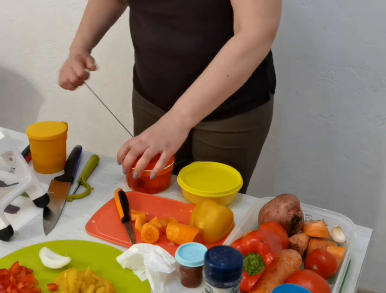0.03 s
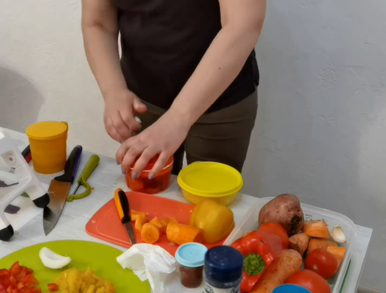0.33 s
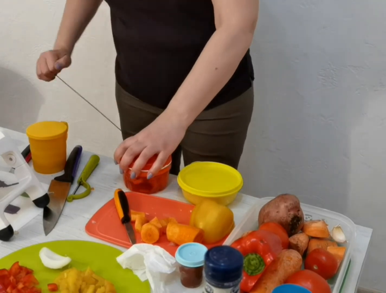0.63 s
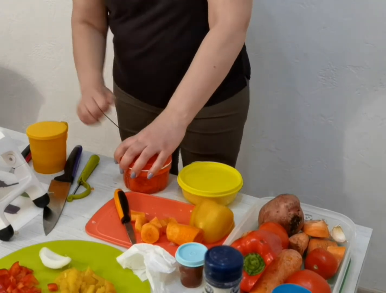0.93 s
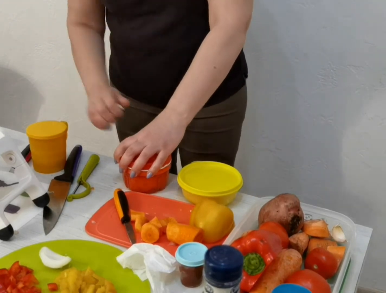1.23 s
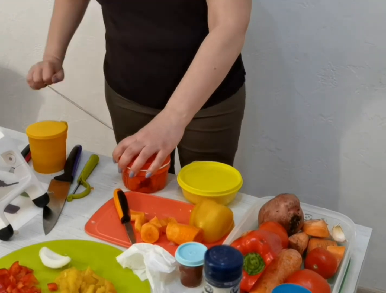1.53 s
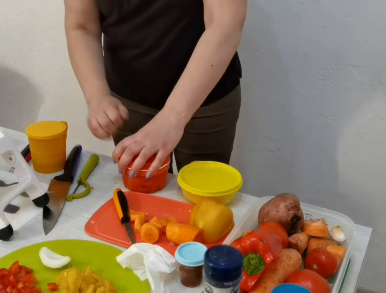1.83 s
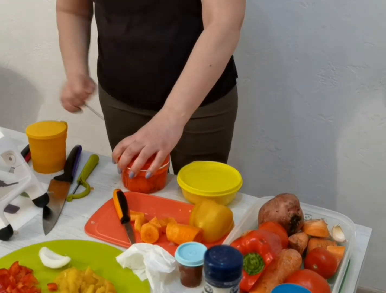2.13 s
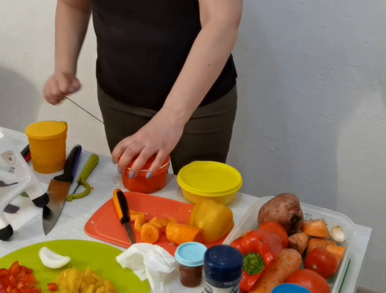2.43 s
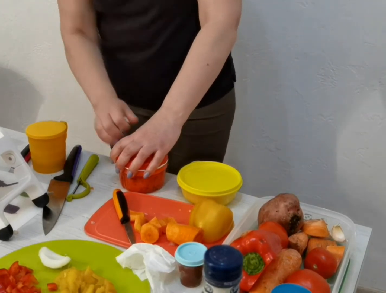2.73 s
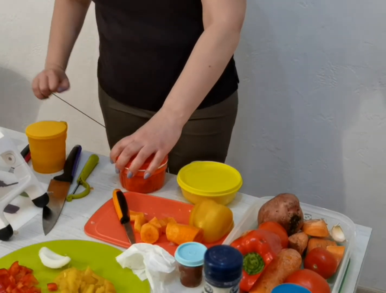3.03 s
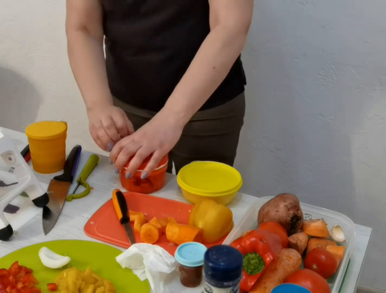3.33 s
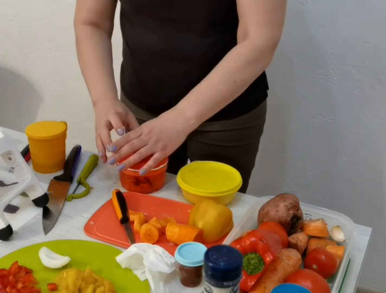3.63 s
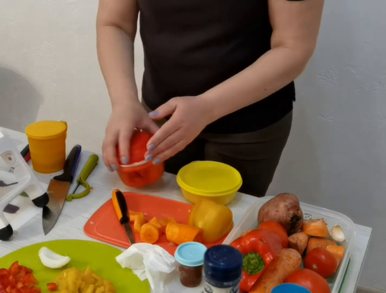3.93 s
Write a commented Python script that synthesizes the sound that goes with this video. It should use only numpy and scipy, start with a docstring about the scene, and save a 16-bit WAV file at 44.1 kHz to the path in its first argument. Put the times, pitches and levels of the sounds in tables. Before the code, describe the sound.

Close to the microphone, a hand-pulled food chopper grinds and rattles vegetables in its plastic bowl, alternating with the zip of its rewinding cord. Seven quick pulls end in a short rewind and clicks, over soft, steady kitchen sizzling.

```python
"""A kitchen, in stereo, close to a table where a pull-cord chopper stands a little to the left.
It is pulled seven times. Each pull grinds the drive while the blades cut vegetable pieces and throw them
against the plastic bowl; then the spring rasps the cord back in and the blades coast. A last short rewind
takes up the slack. The table shudders underneath, and something sizzles steadily in the room."""
import sys
import numpy as np
from scipy import signal
from scipy.fft import rfft, irfft
from scipy.io import wavfile

SR = 44100
rng = np.random.default_rng(int(sys.argv[2]) if len(sys.argv) > 2 else 0)


def dump(signal):
    """Clip the signal to [-1, 1] and save it as 16-bit WAV at the path in sys.argv[1]."""
    limited = np.clip(np.atleast_2d(signal).T, -1, 1)
    pcm = np.round(limited * 32767).astype(np.int16)
    wavfile.write(sys.argv[1], SR, pcm)


N = 176400
TIME = np.arange(N) / SR

# pulls of the cord: start_s, rise_s, fall_s, drive_db, knock_db, cut_db, hollow_hz, hollow_db
PULLS = [(-.08, 0.099, 0.28, -31, -20.5, -28.5, 560, -32.5), (.42, 0.14, 0.17, -30.5, -24.5, -23, 814, -36),
         (.89, .13, 0.16, -30, -27, -25, 600, -38), (1.35, 0.14, .16, -30.5, -29, -25, 550, -38),
         (1.8, .18, .15, -30.5, -34, -26.5, 836, -39), (2.31, .15, .19, -30.5, -32.5, -26, 755, -39.5),
         (2.85, 0.14, 0.2, -33, -32, -28, 741.6, -33)]
# the cord runs back: start_s, attack_s, hold_s, release_s, scrape_hz, scrape_width_hz,
# rasp_db, spring_db, scrape_db, coasting_db, eyelet_db
REWINDS = [(0.17, 0.098, 0.015, 0.19, 2700, 400, -27.5, -25, -32, -29.5, -32),
           (0.651, 0.08, 0.087, 0.1, 2450, 806, -29, -25, -36.5, -30, -29.5),
           (1.151, .025, .1, 0.1, 2340, 500, -28, -30, -36, -33.5, -42),
           (1.593, 0.044, 0.081, 0.21, 2620, 500, -29, -31, -39, -32, -34),
           (2.081, 0.031, .077, 0.19, 2950, 900, -29.5, -32.5, -34.5, -35, -32.5),
           (2.601, 0.015, 0.086, .15, 2308, 700, -28, -29.5, -39, -32.5, -36),
           (3.166, 0.025, 0.058, .15, 2820, 480, -28, -29.5, -29, -33, -29),
           (3.517, .003, 0.073, 0.1, 2500, 520, -31.5, -36, -32.5, -63, -35)]
# resonances of the bowl, the spring housing and the cord's rasp: pitch_hz, width_hz, boost_db
BOWL_MODES = [(83, 7.9, 10), (99, 4.6, 4), (160.3, 6, 7), (209, 6.5, 6), (236.5, 3, 6.5), (318, 6.7, 12),
              (361, 9.1, 2.5), (387, 11, 7)]
HOUSING_MODES = [(1571, 25, 3), (2064, 20, 5), (2145, 70, 6), (2340, 60, 3), (2492, 22, 5), (2635, 50, 5),
                 (2900, 200, 2), (3433, 35, 8)]
RASP_MODES = [(4467, 20, 8), (4650, 60, 4), (6400, 120, 3), (6978, 60, 5), (8380, 220, 3)]
# broad spectrum of the spring housing: frequency_hz, relative_db
HOUSING_COLOUR = [(200, -24.5), (700, -4), (1100, -6), (1600, -1), (2300, 1), (3000, 0), (3800, -6.5),
                  (6000, -6), (14000, -32)]


def from_db(db):
    """Decibels to gain."""
    return 10 ** (np.asarray(db) / 20)


def at_hz(points, hz):
    """Reads a table on a log-frequency axis."""
    f, value = np.transpose(points)
    return np.interp(np.log(hz + 1), np.log(f), value)


def convolve(x, response):
    """Plays x through one response per row."""
    return signal.fftconvolve(np.atleast_2d(x), np.atleast_2d(response), axes=1)[:, :N]


def body(x, colour, modes=(), size=16384):
    """A causal body of unit power gain: a broad colour with resonances standing out of it."""
    hz = np.arange(size // 2 + 1) * SR / size
    power = np.ones(len(hz))
    for f, width, boost in modes:
        power += (from_db(abs(boost)) ** 2 - 1) / (1 + (2 * (hz - f) / width) ** 2)
    cepstrum = irfft(np.log(from_db(at_hz(colour, hz)) * np.sqrt(power)))
    cepstrum[size // 2:] = 0   # minimum phase
    cepstrum[0] = 0
    response = irfft(np.exp(rfft(2 * cepstrum)))
    return convolve(x, response / np.linalg.norm(response))[0]


def resonate(x, hz, width_hz):
    """One resonance with a gain of 1 at its peak."""
    r = np.exp(-np.pi * width_hz / SR)
    feedback = [1, -2 * r * np.cos(2 * np.pi * hz / SR), r * r]
    return signal.lfilter(np.array([1, 0, -1]) * (1 - r * r) / 2, feedback, x + 1e-18)


def glide(x, hz, width_hz):
    """A resonance whose centre follows the curve hz; white noise keeps its rms."""
    turn = np.exp(2j * np.pi * np.cumsum(hz) / SR)
    narrow = signal.sosfilt(signal.butter(2, width_hz / 2, fs=SR, output="sos"), x * turn.conj() + 1e-18)
    return (narrow * turn).real * np.sqrt(2 * SR / width_hz)


def grains(per_s, spread_db):
    """Random tiny contacts of uneven size; rms 1."""
    sizes = from_db(spread_db * np.clip(rng.standard_normal(N), -2, 2)) * rng.choice([-1, 1], N)
    x = sizes * (rng.random(N) < per_s / SR)
    return x / (x.std() + 1e-12)


def contacts(per_s, jitter, spread_db):
    """One click each time a tooth or blade comes round, uneven in time and size; rms about 1."""
    passes = np.cumsum(per_s * np.ones(N)) / SR
    timing, strength = rng.standard_normal((4096, 2)).T
    at = np.searchsorted(passes, np.arange(len(timing)) + jitter * timing)
    inside = (at > 0) & (at < N)
    sizes = from_db(spread_db * np.clip(strength, -2, 2))
    polarity = np.sign(np.sin(timing * SR))
    x = np.zeros(N)
    x[at[inside]] = (polarity * sizes / np.sqrt(np.mean(sizes ** 2)))[inside]
    return x * np.sqrt(SR / per_s)


def blows(rows, decay_s, size=4096):
    """Each blow rings briefly at its own pitch, with no weight far below it."""
    out, t = np.zeros(N + size), np.arange(size) / SR
    for (start, db, hz), sign in zip(rows, rng.choice([-1, 1], len(rows))):
        at = int(max(start, 0) * SR)
        ring = sign * from_db(db) * np.sin(2 * np.pi * hz * t) * np.exp(-t / decay_s)
        out[at:at + size] += signal.sosfilt(signal.butter(2, hz / 2, "high", fs=SR, output="sos"), ring)
    return out[:N]


def stereo_grit(level, colour, modes, per_s, spread_db):
    """Grains under a level curve, through a body; their diffuse share differs between the sides."""
    # how diffusely the grains reach the microphones: frequency_hz, side_over_mid_db
    diffuse = [(1000, -4), (2500, 0.5), (4500, -1), (6000, 3.5), (7200, -8), (8800, -53), (10500, -3),
               (13000, -7)]
    mid, side = (body(level * grains(per_s, spread_db), colour, modes) for _ in range(2))
    side = irfft(rfft(side) * from_db(at_hz(diffuse, np.arange(N // 2 + 1) * SR / N)), N)
    return np.array([mid + side, mid - side])


def kitchen_response(size=14000):
    """Stereo reflections of the kitchen: octave bands of noise, each dying at its own rate."""
    # reverberation time: frequency_hz, t60_s
    decay_times = [(100, 0.059), (500, 0.36), (2000, 0.31), (8000, 0.099), (16000, 0.096)]
    t, hz = np.arange(size) / SR, np.arange(size // 2 + 1) * SR / size
    white, out = rfft(rng.standard_normal((2, size))), 0
    octaves = np.log2(np.geomspace(62.5, 16000, 9))
    for centre, share in zip(octaves, np.eye(len(octaves))):
        band = irfft(white * np.interp(np.log2(hz + 1), octaves, share))
        out += band * 1000 ** (-t / at_hz(decay_times, 2 ** centre))
    out *= t > .002
    return out / np.linalg.norm(out, axis=1, keepdims=True)


def reverberate(x, room, wet_db):
    """Adds the kitchen to a stereo source."""
    return x + from_db(wet_db) * convolve(x, room)


def place(x, room, wet_db, pan_db, left_lead_s=.00007):
    """Direct sound, reaching the left microphone first, plus reflections, at constant power."""
    wet = from_db(wet_db)
    right = np.interp(np.arange(N) - np.round(left_lead_s * SR), np.arange(N), x)
    pan = from_db([[pan_db / 2], [-pan_db / 2]])
    return pan * (np.array([x, right]) + wet * convolve(x, room)) / np.sqrt(1 + wet ** 2)


def background(room):
    """A fine steady sizzle over the low tone of the room."""
    # spectra of the room tone and the sizzle: frequency_hz, relative_db
    tone_colour = [(25, -7), (55, -8.5), (100, 4), (270, 2), (500, 0.5), (900, -13), (2000, -17),
                   (6000, -11.5)]
    sizzle_colour = [(900, -25.5), (2000, -15.5), (3300, -18.5), (5000, -13), (6200, -4), (7200, -1),
                     (8200, 2.5), (9200, -5), (10300, -7.5), (11600, -18.5), (15500, -23)]
    tone = from_db(-44) * body(rng.standard_normal(N), tone_colour)
    sizzle = stereo_grit(from_db(-31), sizzle_colour, (), per_s=9000, spread_db=1)
    return sizzle + place(tone, room, wet_db=-6, pan_db=1.5)


def table_and_thrum():
    """The table shudders at its lowest mode under the chopper, and the blades thrum low beside it."""
    # the table's mode and the blades' thrum: pitch_hz, width_hz
    modes = [(52, 5.5), (95, 57)]
    # their levels: time_s, table_db, thrum_db
    shudder = [(0, -42, -39), (.3, -44, -47), (.55, -56, -50), (.85, -57, -54), (1.12, -38.5, -60),
               (1.4, -65, -48.5), (2.3, -62, -52.5), (2.48, -51, -40), (2.7, -58, -54), (2.999, -57, -43.5),
               (3.28, -60, -41.5), (3.5, -58, -66)]
    times, *curves = np.transpose(shudder)
    out = 0
    for (hz, width), db in zip(modes, curves):
        rumble = resonate(resonate(rng.standard_normal(N + SR), hz, width), hz, width)[SR:]
        out += rumble / rumble.std() * from_db(np.interp(TIME, times, db))
    return out


def clacks(room):
    """The drive catches or the handle clicks home: a quickly dying cluster of contacts rings the housing."""
    # each clack: start_s, snap_db, housing_db, decay_s
    hits = [(.353, -25, -34, 0.022), (0.423, -25.5, -25.5, 0.011), (0.505, -39, -29, 0.0088),
            (0.62, -22.5, -28, 0.017), (0.905, -28, -29, 0.014), (1.201, -25.5, -42, .018),
            (1.36, -26, -30.5, 0.015), (1.537, -22.5, -29, 0.017), (2.319, -29, -33, 0.013),
            (2.417, -27, -35, 0.012), (2.516, -24, -33, 0.013), (2.842, -26, -32, 0.023),
            (3.183, -32, -28, 0.0091), (3.526, -18, -31, 0.0034), (3.534, -22, -34, 0.0044),
            (3.564, -30, -39, 0.004)]
    # spectrum of the snap: frequency_hz, relative_db
    snap_colour = [(1000, -23), (3500, -6), (5000, 16.5), (6800, 18), (8500, 16), (10200, 18.5),
                   (12000, -2), (15500, -40)]
    snap_level, ring_level = sum(
        from_db(db)[:, None] * (TIME >= start) * np.exp(-np.abs(TIME - start) / decay)
        for start, *db, decay in hits)
    snap = stereo_grit(snap_level, snap_colour, RASP_MODES, per_s=4900, spread_db=1.5)
    ring = stereo_grit(ring_level, HOUSING_COLOUR, HOUSING_MODES, per_s=5000, spread_db=2.5)
    return reverberate(snap + ring, room, wet_db=-2.5)


def rewind_shape(start, attack, hold, release):
    """The level of one rewind rises to 1, holds and dies away."""
    t = TIME - start
    return np.clip(t / attack, 0, 1) * np.exp(-2 * (np.maximum(t - attack - hold, 0) / release) ** 1.09)


def coasting_blades(room, whirr_hz=401.7, sag_per_s=0.84):
    """The freewheeling blades rattle the bowl and hum lower as they slow."""
    swirl, rattle_level, whirr = rng.standard_normal(N), 0, 0
    for start, attack, hold, release, *_, coasting_db, _ in REWINDS:
        level = from_db(coasting_db) * rewind_shape(start, attack, hold, release)
        rattle_level += level
        pitch = whirr_hz * np.exp(-sag_per_s * np.maximum(TIME - start, 0))
        whirr += glide(level * swirl, pitch, width_hz=35)
    # spectrum of the rattle: frequency_hz, relative_db
    rattle_colour = [(30, -25), (60, -25), (100, -4), (200, 6), (350, 3), (480, -3.5), (800, -16),
                     (1500, -4), (4000, -50), (12000, -73)]
    rattle = body(rattle_level * contacts(300, jitter=0.363, spread_db=5.5), rattle_colour, BOWL_MODES)
    return place(0.88 * rattle + from_db(-9.5) * whirr, room, wet_db=-12.5, pan_db=2)


def return_spring(room, sag_per_s=0.7):
    """The coils rub and ring their housing; their scrape sinks in pitch as the spring relaxes."""
    slips, coil_level, scrape = grains(per_s=2500, spread_db=0.5), 0, 0
    for start, attack, hold, release, hz, width_hz, _, spring_db, scrape_db, *_ in REWINDS:
        shape = rewind_shape(start, attack, hold, release)
        coil_level += 1.06 * from_db(spring_db) * shape
        pitch = hz * (1 - sag_per_s * np.clip(TIME - start, 0, attack + hold))
        scrape += glide(from_db(scrape_db) * shape * slips, pitch, width_hz)
    rubs = [from_db(side_db) * coil_level * grains(per_s=1500, spread_db=0.5) for side_db in (.5, -.5)]
    coils = np.array([body(rub, HOUSING_COLOUR, HOUSING_MODES) for rub in rubs])
    return reverberate(coils, room, wet_db=-6.5) + place(scrape, room, wet_db=-4, pan_db=0.2)


def cord_rasp(room, eyelet_hz=5500, eyelet_lag_s=0.038):
    """The cord rasps back in; its eyelet hisses a moment later, once the cord runs fast."""
    # spectrum of the rasp: frequency_hz, relative_db
    rasp_colour = [(1000, -19.5), (3500, -9.5), (4800, -1), (6000, -1.5), (7500, 6.5), (8600, 2),
                   (10200, -3), (11700, -13), (15500, -20)]
    rasp_level, eyelet_level = 0, 0
    for *timing, _, _, rasp_db, _, _, _, eyelet_db in REWINDS:
        shape = rewind_shape(*timing)
        rasp_level += 1.48 * from_db(rasp_db) * shape
        eyelet_level += from_db(eyelet_db) * np.interp(TIME - eyelet_lag_s, TIME, shape)
    rasp = stereo_grit(rasp_level, rasp_colour, RASP_MODES, per_s=2500, spread_db=0.5)
    hiss = glide(eyelet_level * grains(per_s=4600, spread_db=3.5), np.full(N, eyelet_hz), width_hz=1200)
    return reverberate(rasp, room, wet_db=-6.5) + place(hiss, room, wet_db=-4, pan_db=0.2)


def cord_speed(start, rise, fall):
    """One pull speeds up from rest to 1 and slows to rest again."""
    return np.sin(np.pi / 2 * np.interp(TIME, [start, start + rise, start + rise + fall], [0, 1, 0]))


def drive_grind(room, full_speed_teeth_per_s=420):
    """The teeth of the drive click faster and louder with the cord's speed, over a fine friction."""
    # spectrum of the drive: frequency_hz, relative_db
    drive_colour = [(120, -37), (350, -4.5), (600, 1), (950, 0.5), (1300, 0), (1900, 1), (2700, -7),
                    (4000, -21), (9000, -37), (15000, -59)]
    # its resonances: pitch_hz, width_hz, boost_db
    drive_modes = [(557, 35, 7), (620, 30, 3), (698, 30, 6), (776, 20, 9), (895, 35, 5), (947, 40, 4),
                   (1571, 20, 4), (1706, 35, 4)]
    speed, level = 0, 0
    for start, rise, fall, drive_db, *_ in PULLS:
        stroke = cord_speed(start, rise, fall)
        speed += stroke
        level += from_db(drive_db) * stroke ** 2.3
    teeth = from_db(0.5) * contacts(full_speed_teeth_per_s * (.2 + .8 * speed), jitter=.15, spread_db=5.5)
    grind = body(level * (teeth + grains(per_s=1500, spread_db=1)), drive_colour, drive_modes)
    return place(grind, room, wet_db=-3, pan_db=3)


def cutting_blades(room):
    """The blades slice wetly, break crisp pieces and rap on hard ones."""
    # spectra of wet cutting and of crisp breaking: frequency_hz, relative_db
    wet_colour = [(1000, -1), (3000, -3.5), (4800, 0), (6500, 4.5), (8400, 7), (10000, -5), (11700, -11.5),
                  (15500, -30)]
    crisp_colour = [(2000, -22), (4000, -7), (5300, -1), (7000, -2), (10000, -6), (13000, -9), (15500, -16)]
    # strikes on hard pieces: start_s, relative_db, pitch_hz
    strikes = [(0.02, -12, 550), (0.063, -29, 550), (0.529, -17, 790), (0.576, -21, 670),
               (0.596, -12.5, 790), (1.014, -16, 622.7), (1.029, -14, 610.8), (1.054, -22, 640),
               (1.48, -19, 550), (1.509, -21, 660), (1.988, -15, 705), (2.01, -24, 959.6),
               (2.413, -13.5, 687.8), (2.451, -18, 891), (2.977, -18, 710), (3.039, -26, 775)]
    level = sum(from_db(cut_db) * cord_speed(*timing) ** 1.2 for *timing, _, _, cut_db, _, _ in PULLS)
    slicing = stereo_grit(0.7 * level, wet_colour, (), per_s=2200, spread_db=0.5)
    crackle = from_db(-11.5) * body(level * grains(per_s=260, spread_db=6), crisp_colour)
    raps = from_db(-5.5) * blows(strikes, decay_s=0.0073)
    return (reverberate(slicing, room, wet_db=-3) + place(crackle, room, wet_db=-2, pan_db=1)
            + place(raps, room, wet_db=-3, pan_db=3))


def bowl_knocks(room, glide_share=0.26):
    """Pieces knock on the bowl; its hollow ring rises in pitch as they are flung outwards."""
    # spectrum of the knocking: frequency_hz, relative_db
    knock_colour = [(25, -20), (48, -25), (75, -39), (120, -10), (180, 1), (300, -4.5), (450, -13.5),
                    (900, -19), (3000, -29.5), (12000, -89)]
    # heavy pieces thump on the wall: start_s, level_db, pitch_hz
    thumps = [(.024, -13, 230), (.032, -17, 192), (.056, -19, 182), (.090, -22, 170), (.137, -14, 166),
              (.476, -19, 200), (.519, -13.5, 211), (.588, -25, 220), (1.564, -17, 172),
              (2.425, -18.5, 225), (2.516, -22, 210), (2.552, -20, 168.8), (3.07, -24, 158)]
    pieces, level, hollow = contacts(240, jitter=0.472, spread_db=5.5), 0, 0
    for *timing, _, knock_db, _, hollow_hz, hollow_db in PULLS:
        speed = cord_speed(*timing)
        level += from_db(knock_db) * speed ** 1.7
        pitch = hollow_hz * (1 + glide_share * (speed - 1))
        hollow += glide(from_db(hollow_db) * speed ** 6.3 * pieces, pitch, width_hz=225)
    knocks = body(level * contacts(330, jitter=.8, spread_db=0), knock_colour, BOWL_MODES)
    knocks += blows(thumps, decay_s=0.0095)
    return place(hollow, room, wet_db=-3, pan_db=3) + place(knocks, room, wet_db=-15.5, pan_db=0.8)


def scene():
    """Background, table and chopper; pulls, rewinds, clacks and background have their own reflections."""
    pull_room, rewind_room, clack_room, far_room = (kitchen_response() for _ in range(4))
    pulls = drive_grind(pull_room) + cutting_blades(pull_room) + bowl_knocks(pull_room)
    rewinds = coasting_blades(rewind_room) + return_spring(rewind_room) + cord_rasp(rewind_room)
    return background(far_room) + table_and_thrum() + clacks(clack_room) + rewinds + pulls


def record(dry):
    """The top is cut steeply above 15.7 kHz."""
    return signal.sosfilt(signal.ellip(12, .1, 90, 15700, fs=SR, output="sos"), dry)


dry = scene()
out = record(dry)
dump(out)
```